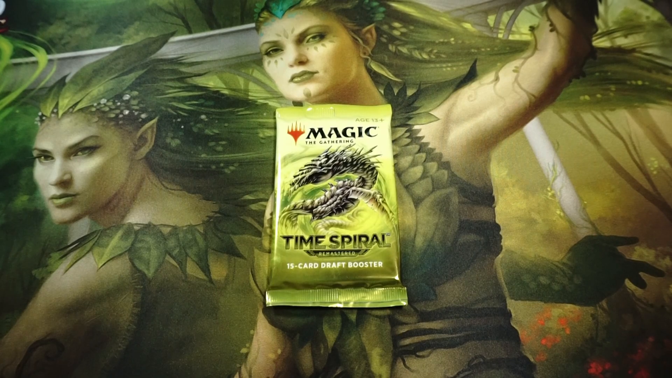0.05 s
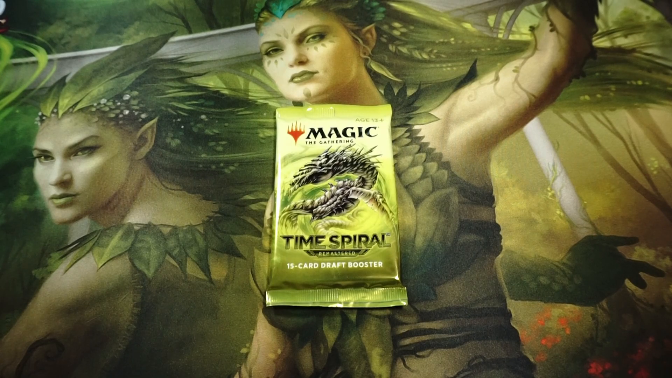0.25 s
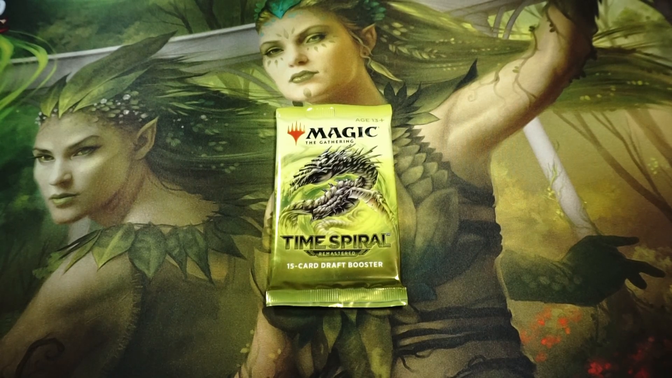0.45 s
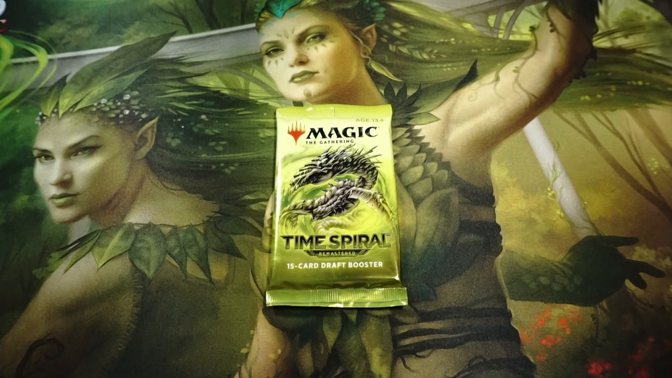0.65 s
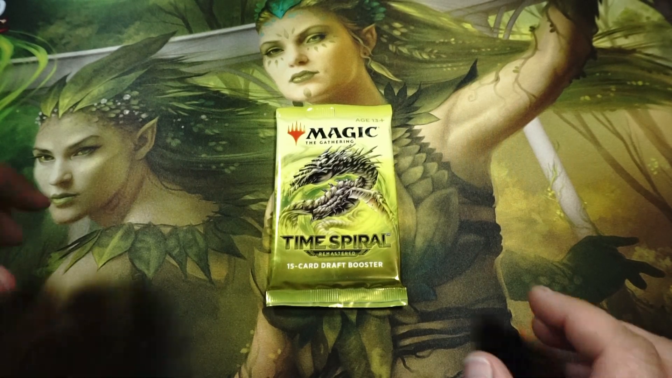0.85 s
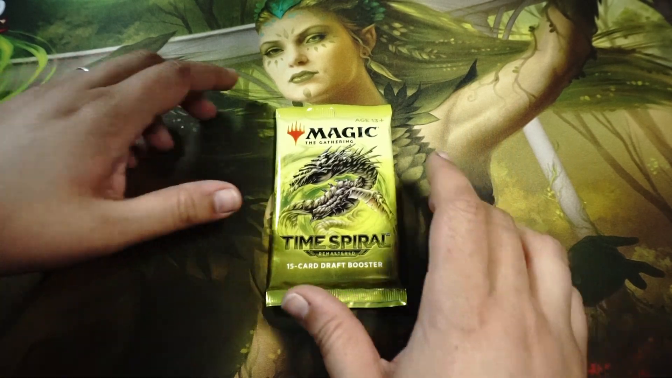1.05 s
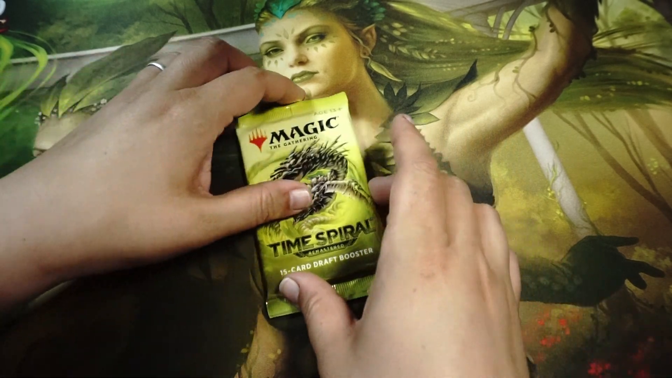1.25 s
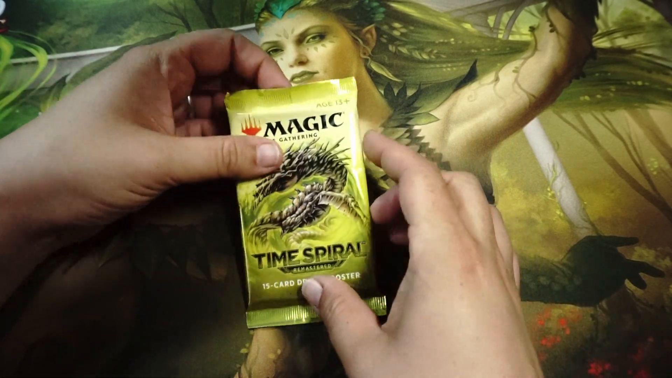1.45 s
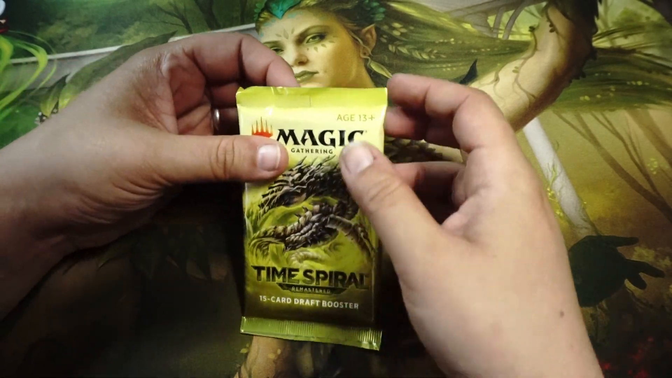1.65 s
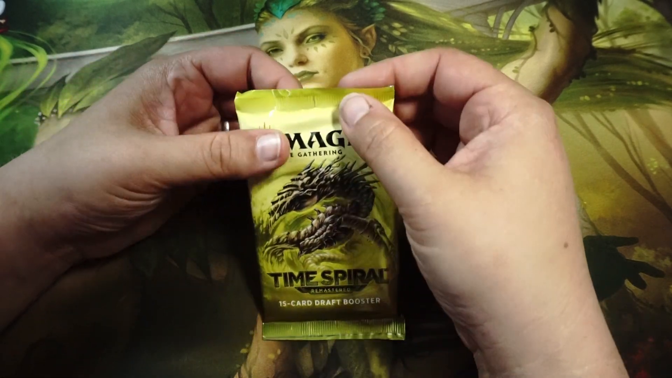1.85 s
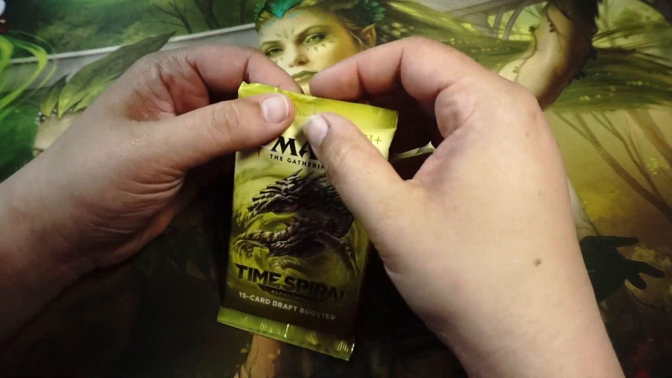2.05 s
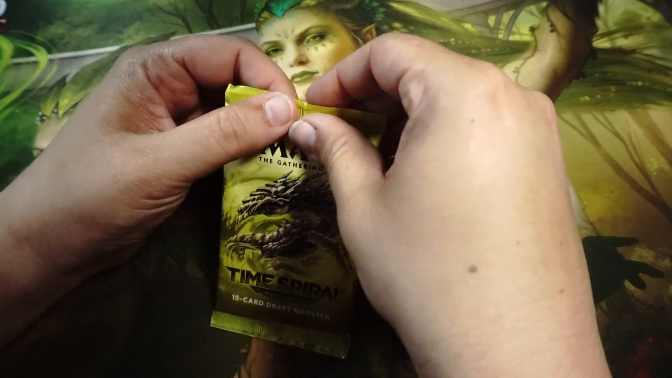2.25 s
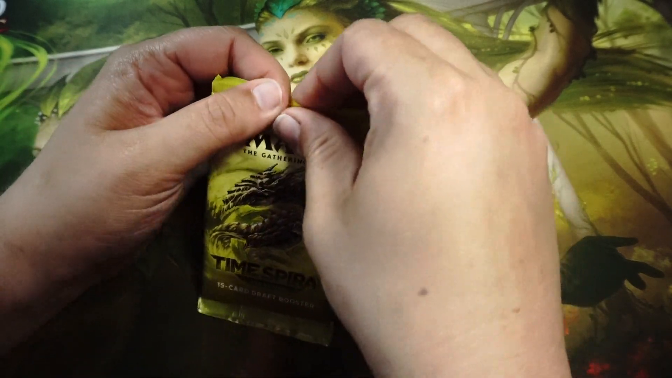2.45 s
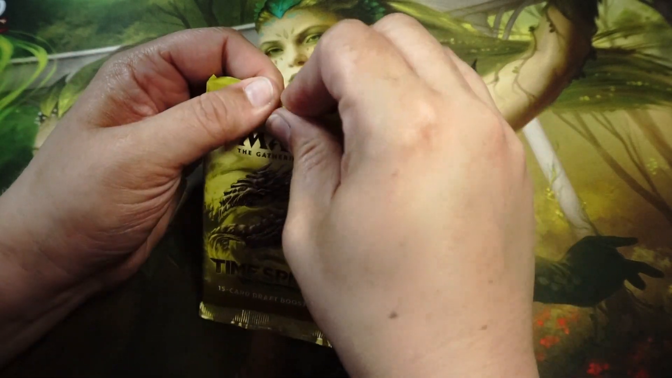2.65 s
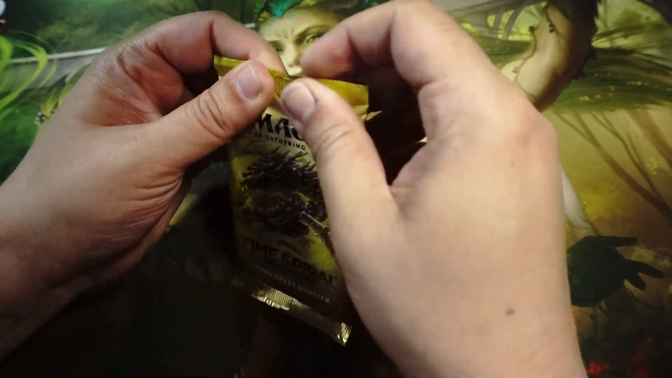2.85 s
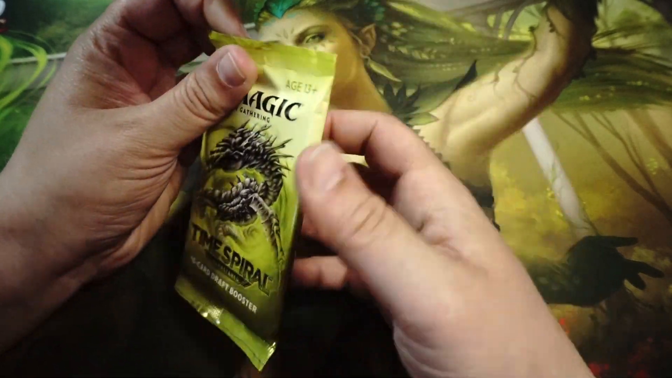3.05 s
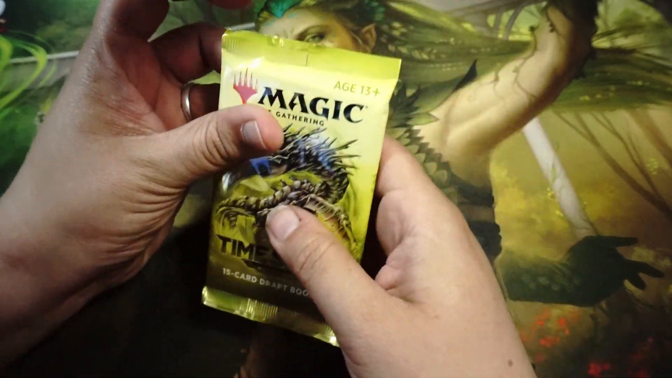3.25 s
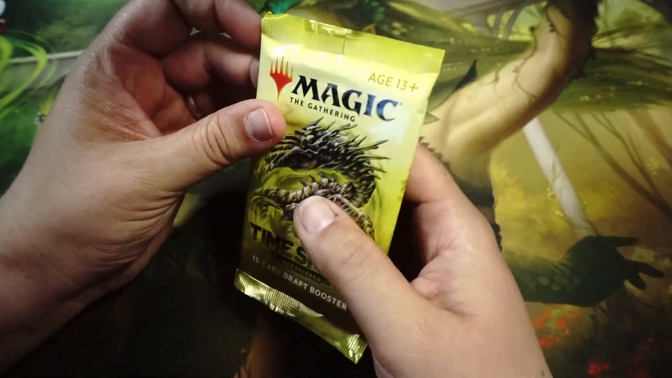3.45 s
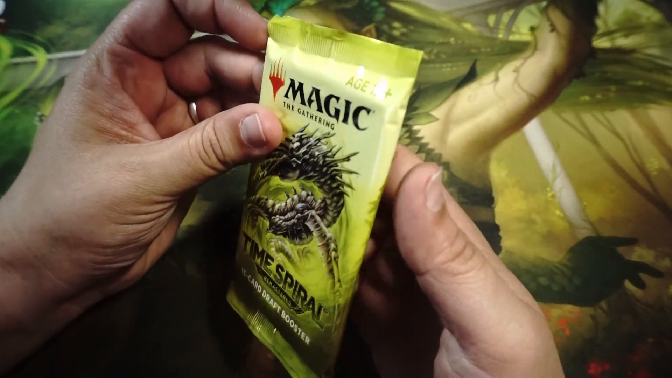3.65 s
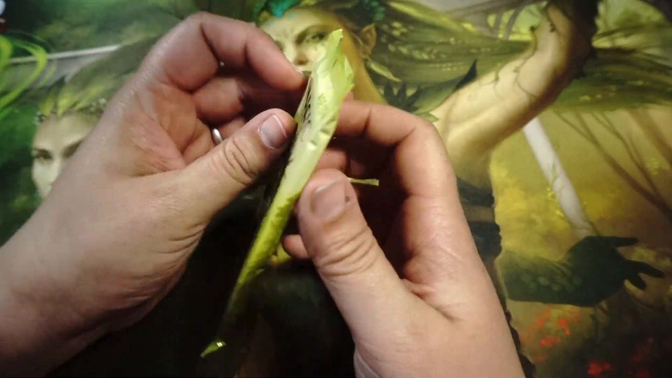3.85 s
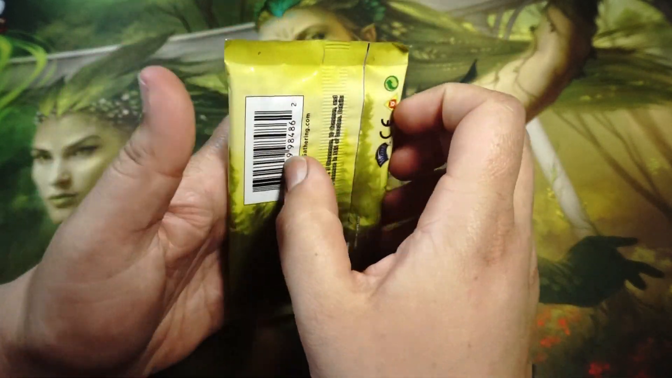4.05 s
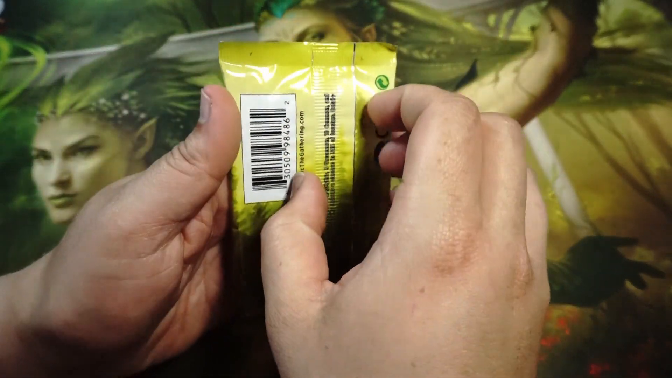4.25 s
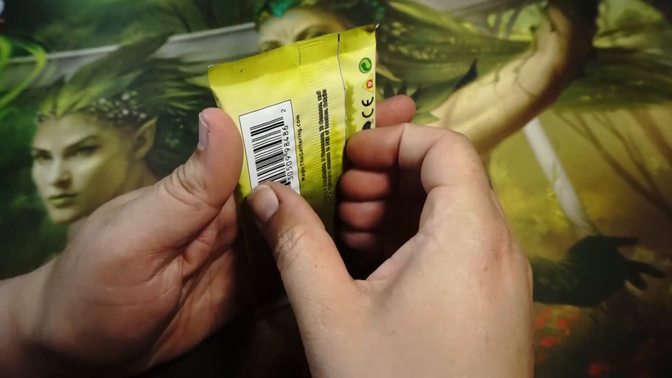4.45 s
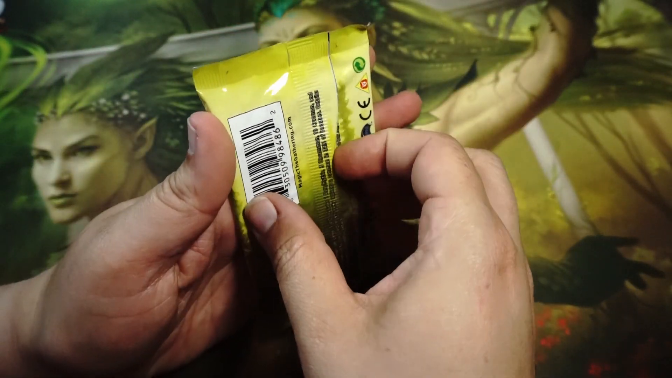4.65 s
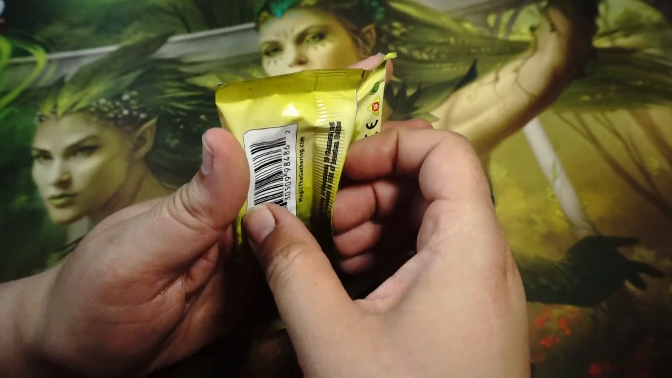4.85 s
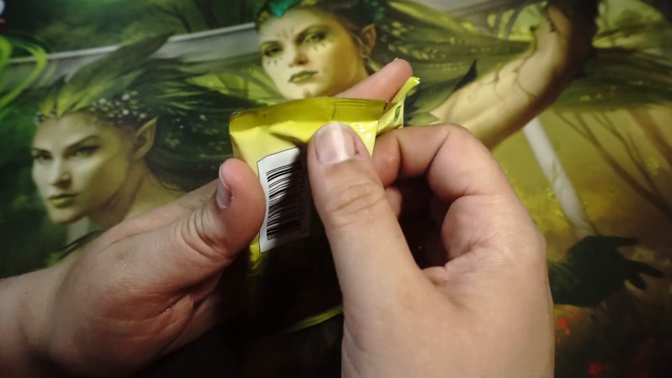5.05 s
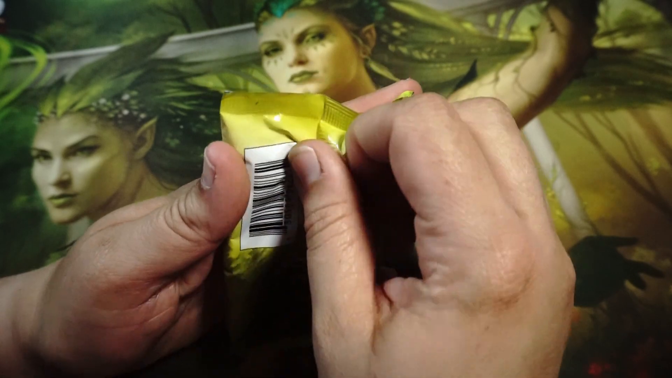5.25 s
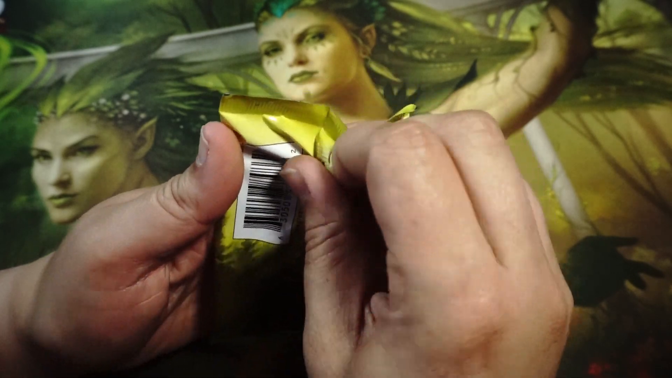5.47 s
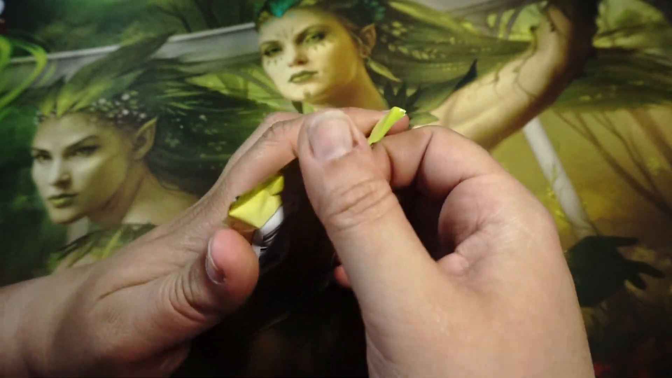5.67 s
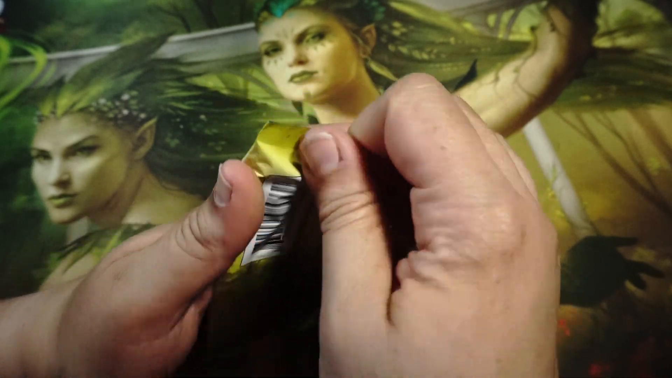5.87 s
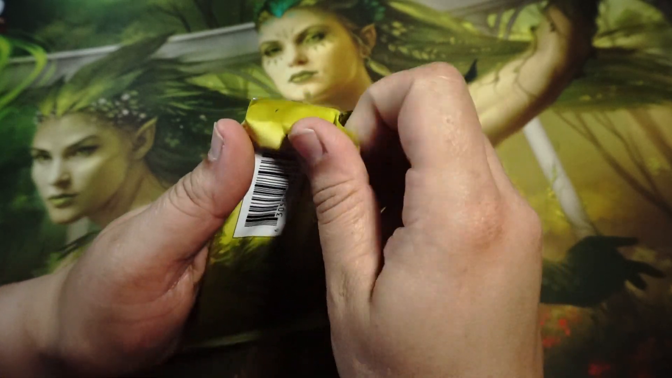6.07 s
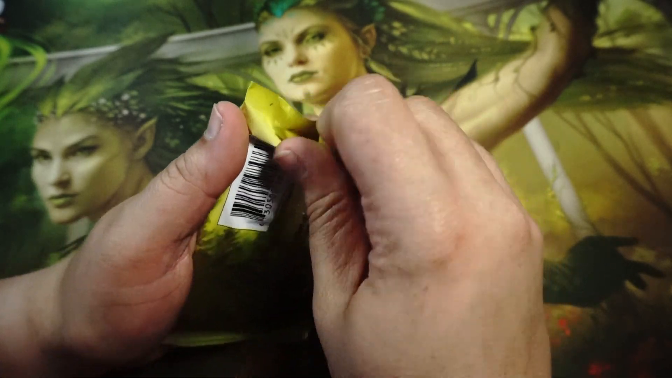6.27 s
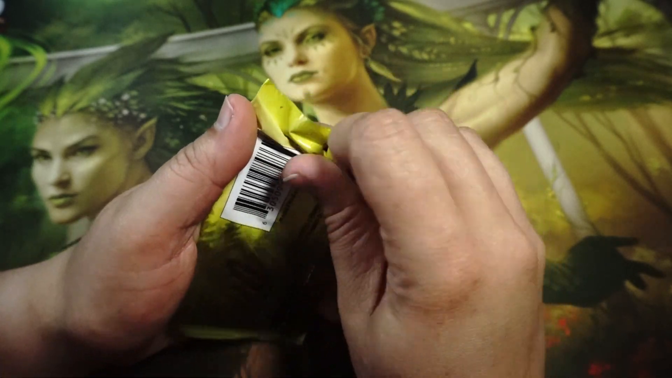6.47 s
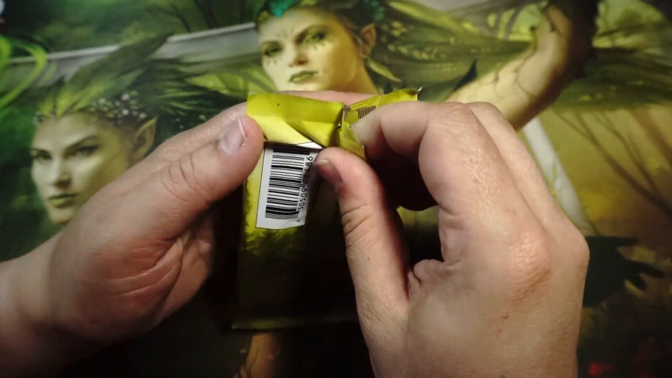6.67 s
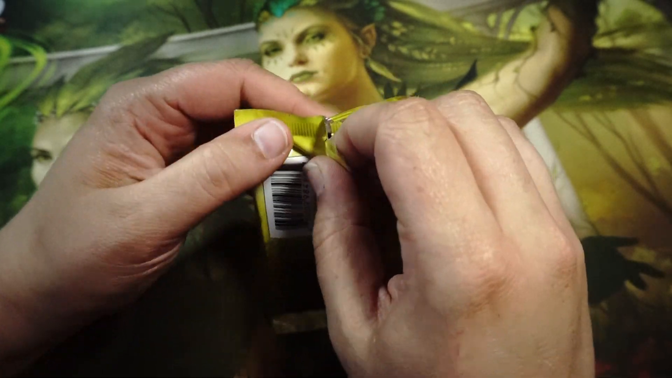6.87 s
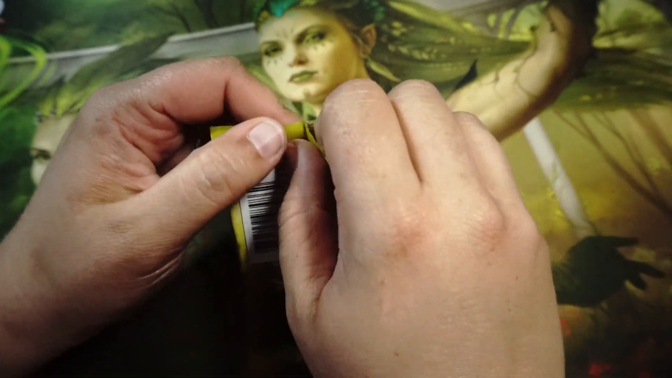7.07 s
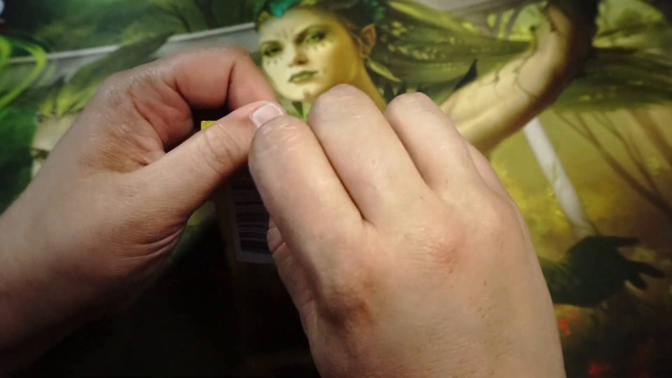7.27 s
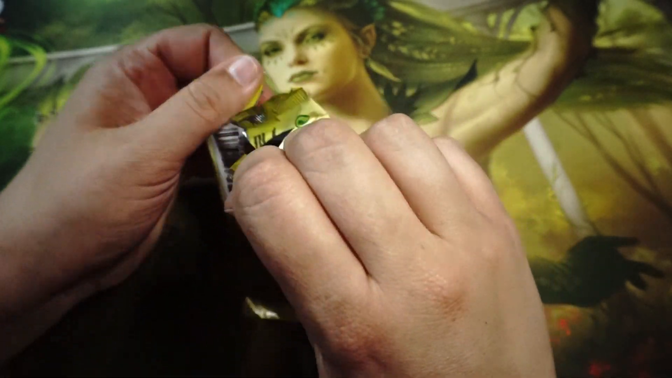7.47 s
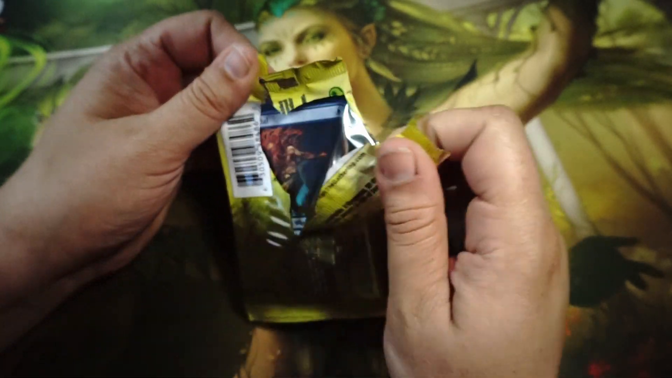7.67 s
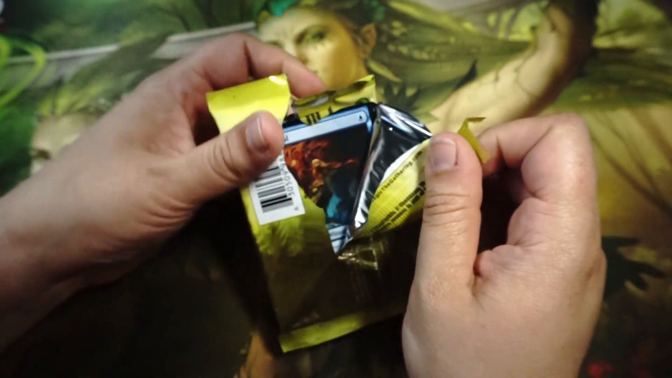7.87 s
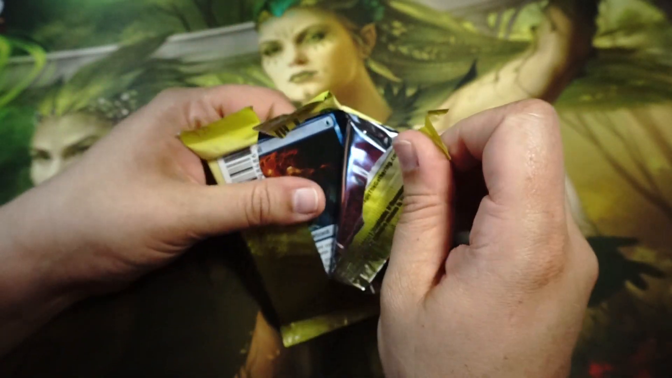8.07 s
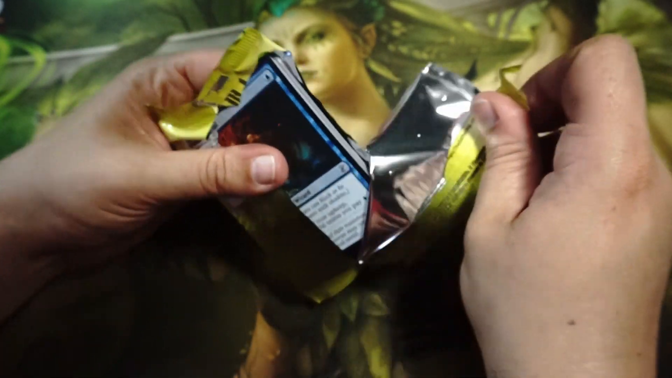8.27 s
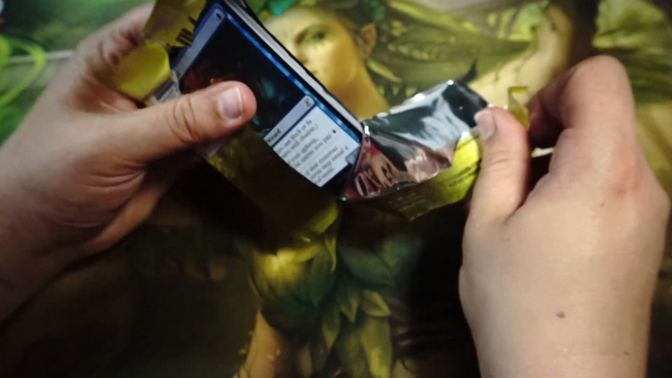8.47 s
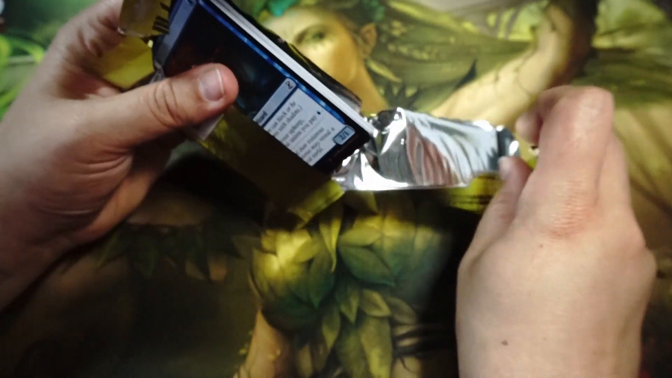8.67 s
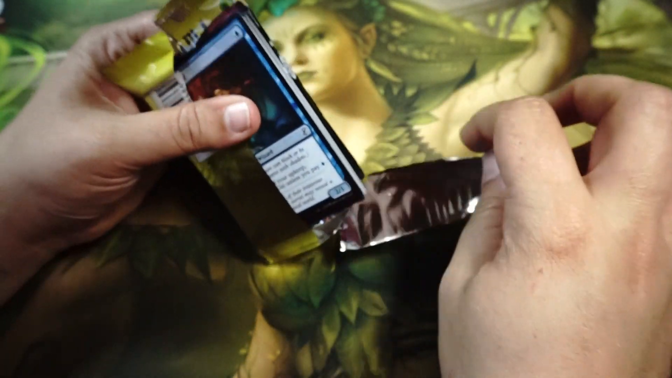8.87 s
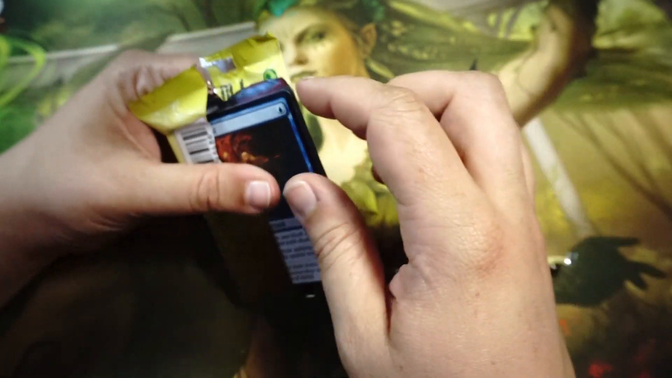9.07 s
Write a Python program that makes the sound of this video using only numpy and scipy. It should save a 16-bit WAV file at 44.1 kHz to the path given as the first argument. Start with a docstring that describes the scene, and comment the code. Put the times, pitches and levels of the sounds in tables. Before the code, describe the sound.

In a small quiet room, close to the microphone, about a second of faint rumble and hiss passes with one soft table bump. Hands then pick up a foil packet: sharp single snaps and fine crackles, a brief lull, then denser crumpling with dull finger knocks. The seam peels with a very short buzzing zip, followed by the loudest burst of crackling.

```python
"""Foil creases buckle in single snaps and showers of tiny cracks, close to a microphone, as two hands pick a pack
of cards off a cloth mat, flex it and pinch its crimp. The seam peels open in a quick stick-slip run.
Fingers rub the wrapper and knock the cards inside; the table booms softly.
Snaps and cracks are impulses ringing foil patches; rubs are filtered impulses; knocks are damped swings.
A small quiet room answers faintly, over low rumble, hiss and a thin hum."""
import sys
import numpy as np
from scipy import signal
from scipy.fft import rfft, irfft
from scipy.io import wavfile
from scipy.ndimage import uniform_filter1d, map_coordinates

SR = 44100
rng = np.random.default_rng(int(sys.argv[2]) if len(sys.argv) > 2 else 0)


def put_to_file(sound):
    """Save the sound as 16-bit audio at rate SR, in the file named by the first command-line argument."""
    columns = np.atleast_2d(sound).T  # one column per channel
    safe = np.clip(columns, -1, 1)
    whole_steps = np.round(safe * 32767)
    wavfile.write(sys.argv[1], SR, whole_steps.astype(np.int16))


N = 402191

# Creases that snap through. Each row: time in seconds, rms level in dB over 3 ms around the snap,
# centre of the ring in Hz.
CREASE_SNAPS = [(1.1852, -50.5, 5400), (1.23, -47.5, 5700), (1.262, -49.5, 6800), (1.3356, -35, 4800),
                (1.3788, -33, 6160), (1.431, -27.5, 5100), (1.4335, -38, 1730), (1.472, -28.5, 7550),
                (1.4894, -36, 4860), (1.5255, -42, 1900), (1.542, -43.5, 1400), (1.6081, -40, 5150),
                (1.6612, -41.5, 5600), (1.7615, -34.5, 3500), (1.8361, -40, 5330), (1.926, -30.5, 5650),
                (1.936, -36.5, 7000), (1.981, -28.5, 6070), (1.987, -32, 7580), (2.0846, -46, 5200),
                (2.158, -35.5, 5100), (2.3037, -38, 6200), (2.3554, -50, 2900), (2.412, -35, 5650),
                (2.4173, -33, 5870), (2.572, -27, 5530), (2.614, -35.5, 5600), (2.636, -45, 6990),
                (2.684, -46, 5000), (2.7098, -38, 5770), (2.7573, -38, 10800), (2.803, -49, 5900),
                (2.825, -37, 6040), (2.894, -43, 6517), (2.9157, -40, 4500), (3.068, -41, 6240),
                (3.1219, -38, 5100), (3.1303, -35, 5780), (3.1686, -31.5, 7670), (3.2662, -29, 6600),
                (3.345, -41, 6600), (4.156, -55.5, 5560), (4.299, -55.5, 2130), (4.586, -46.5, 4350),
                (4.6278, -48, 5750), (4.6995, -28, 6800), (4.7834, -25.5, 6330), (4.8569, -28, 5140),
                (4.867, -35.5, 6550), (5.0237, -40, 4300), (5.033, -37, 4060), (5.069, -33.5, 3184),
                (5.1086, -44, 6000), (5.165, -36, 5790), (5.1825, -26.5, 3150), (5.2632, -42, 5070),
                (5.306, -32.5, 4980), (5.315, -33.5, 3980), (5.401, -31.5, 5930), (5.403, -33, 5900),
                (5.515, -38, 5460), (5.521, -39.5, 4400), (5.557, -32.5, 6090), (5.734, -40.5, 5280),
                (5.7758, -30.5, 6300), (5.816, -30.5, 5500), (5.824, -35.5, 3346), (5.9177, -24.5, 4660),
                (5.929, -35.5, 7100), (5.99, -35.5, 5900), (6.027, -37, 6700), (6.0858, -32, 4930),
                (6.2243, -28.5, 7450), (6.3077, -25.5, 5600), (6.409, -31.5, 6540), (6.4566, -24.5, 7460),
                (6.473, -27, 9600), (6.7065, -42, 3600), (6.718, -37, 5100), (6.7605, -34.5, 5230),
                (6.9304, -31.5, 6350), (6.989, -34, 7447), (7.004, -36, 4940), (7.076, -42, 4500),
                (7.1211, -34, 7150), (7.1387, -29.5, 4240), (7.152, -34.5, 7700), (7.2393, -31.5, 6660),
                (7.3875, -29, 6270), (7.3972, -28, 7150), (7.444, -28.5, 6940), (7.4834, -27, 6200),
                (7.488, -24, 5800), (7.5216, -35, 7350), (7.6719, -34.5, 4200), (7.759, -37.5, 8600),
                (7.779, -34, 5930), (7.8217, -27, 5000), (7.835, -34, 5900), (7.9042, -39.5, 7500),
                (7.955, -34, 2850), (8.045, -30, 9700), (8.1158, -28.5, 6760), (8.162, -32, 4530),
                (8.197, -30, 6000), (8.231, -35, 1720), (8.2969, -23.5, 4100), (8.517, -31, 5550),
                (8.549, -24, 7300), (8.573, -29, 7000), (8.5871, -23.5, 5070), (8.594, -22, 8700),
                (8.6418, -26, 4930), (8.666, -29, 4960), (8.68, -27, 8320), (8.7052, -26, 6600),
                (8.708, -26.5, 7000), (8.7146, -20.5, 6300), (8.803, -29.5, 4470), (8.823, -39, 6650),
                (8.839, -33.5, 5450), (8.936, -39, 2860), (8.9763, -43.5, 6900)]
# Colour of the foil. Each row: frequency in Hz, spectral level in dB.
FOIL_COLOUR = [(200, -2.5), (900, 3), (1550, -0.5), (2300, 0), (3500, -4.5), (6500, -0.5), (10500, -4.5),
               (13400, -5.5)]
# Hold on the pack: picked up, turned over, pulled open. Each row: time in seconds, resting crackle level in dB.
GRIP = [(1.0, -86), (1.35, -62), (1.7, -70), (2.1, -66), (2.9, -64), (3.05, -72), (3.3, -79), (3.55, -81.5),
        (4.05, -69.5), (4.35, -78), (4.6, -62), (5.4, -56), (6.6, -52), (7.05, -59), (7.95, -62),
        (8.4, -56), (9.1, -54)]
# Squeezes and pulls that crumple the foil. Each row: start in seconds, length in seconds, mid-move level in dB.
SQUEEZES = [(1.42, 0.066, -49), (1.975, .11, -52), (2.34, 0.16, -59), (2.83, .055, -45.5),
            (3.11, .025, -50), (4.05, 0.012, -59), (4.685, .02, -48), (4.78, .11, -46),
            (5.02, 0.084, -50.5), (5.29, 0.13, -46.5), (5.52, 0.06, -47), (5.63, 0.0219, -46.5),
            (5.74, .12, -42), (5.87, .06, -40), (5.97, 0.0404, -44), (6.28, .1, -43), (6.92, .09, -48),
            (7.23, .09, -46.5), (7.37, .19, -45), (7.435, 0.046, -38.5), (7.67, .03, -46),
            (7.78, .06, -45.5), (8.05, 0.032, -42), (8.155, .23, -42.5), (8.688, 0.026, -31.5),
            (8.785, 0.066, -46.5), (9.07, 0.042, -46)]
# Foil brushing past a fingertip or over itself. Each row: start in seconds, length in seconds,
# mid-move level in dB.
BRUSHES = [(1.04, 0.24, -66.5), (3.655, 0.025, -64), (3.945, 0.033, -53.5), (4.435, 0.011, -51),
           (5.35, 0.13, -56.5), (8.549, 0.015, -33.5)]
# The seam peeling open. Each row: time in seconds, slips per second, mean level in dB, unevenness from 0 to 1.
SEAM_PEEL = [(8.316, 398, -41, .005), (8.323, 398, -32.5, .005), (8.341, 392, -36, .01),
             (8.356, 400, -34, .2), (8.385, 230, -36, .2), (8.428, 150, -49, .4)]
# Resonances of the stretched wrapper, at mid-peel. Each row: frequency in Hz, width in Hz, strength in dB.
POUCH_MODES = [(387, 96, -8), (1300, 270, 4), (2270, 160, 6.5), (4500, 600, 1.5), (6800, 3000, 2.5)]
# Colour of skin on the wrapper. Each row: frequency in Hz, spectral level in dB.
SKIN_COLOUR = [(40, -4.5), (120, 5), (400, -1), (1100, -6.5), (4000, -31)]
# Fingers and cards sliding along the wrapper. Each row: start in seconds, length in seconds,
# mid-move level in dB before RUB_GAIN_DB.
SLIDES = [(3.06, 0.14, -59), (4.55, 0.445, -62.5), (7.43, 0.025, -44), (7.7, 0.16, -55.5),
          (8.16, 0.15, -41), (8.432, 0.062, -48.5), (8.52, 0.18, -47), (8.8, 0.23, -57)]
# The flap and fingertips dragging. Each row: start in seconds, length in seconds, start pitch in Hz,
# end pitch in Hz, rms level in dB.
DRAGS = [(4.777, 0.17, 4300, 4030, -50.5), (7.432, 0.077, 2030, 2390, -43), (7.69, 0.054, 823, 738, -58),
         (8.018, .15, 390, 189, -46)]
# Finger knocks and whole panels popping over. Each row: time of the peak in seconds, peak of the swing in dB,
# pitch in Hz.
THUMPS = [(1.765, -40.5, 85), (3.132, -31.5, 530), (3.173, -32.5, 218), (3.628, -41, 288),
          (3.773, -44, 330), (3.898, -44, 146), (4.061, -31, 94.6), (4.512, -41.5, 147), (4.655, -39, 317),
          (4.786, -34.5, 151), (5.073, -36.5, 330), (5.919, -36, 175), (6.121, -27.5, 310),
          (6.309, -32.5, 335.3), (6.357, -35, 660), (6.458, -34, 94), (7.166, -35, 434), (7.492, -23, 119),
          (7.729, -33.5, 453), (7.808, -33.5, 88), (8.197, -25.5, 177), (8.304, -22.5, 240),
          (8.521, -25.5, 346), (8.609, -30.5, 150), (8.725, -30.5, 184)]
# Arms bumping the table. Each row: start in seconds, peak level in dB.
TABLE_BUMPS = [(0.613, -46.5), (1.529, -46.5), (1.958, -49.5), (4.438, -48)]
# Modes of the table, scattered at each bump. Each row: mean frequency in Hz, relative level in dB, t60 in seconds.
TABLE_MODES = [(45.1, 3, 1), (88.5, 0, 0.81), (127, 2, 0.29)]
# Colour of the still room. Each row: frequency in Hz, spectral level in dB.
AIR_COLOUR = [(20, 0.5), (52, 5.5), (130, -9.5), (420, -11.5), (1000, -17.5), (3500, -31.5), (13400, -39)]

AIR_DB, TOP_HZ = -65.5, 13400
# Hand moves: time constants of build and decay, rise in level over the hold
ATTACK_S, SWELL_DB, RELEASE_S = .008, 3, .016
# Skin drag: level at median effort before the gain, dB per dB of effort, gain
SKIN_DB, SKIN_DB_PER_DB, RUB_GAIN_DB = -70, 0.66, -1
# Settling foil: scale against its snap before the attack, decay time constant
SETTLE_DB, SETTLE_S = -27, .06


def snaps():
    """A crease flips in one sample; effort adds splinters around it, a firmer grip broadens its ring."""
    ring_s, whine, focus_db, focus_db_per_grip_db = 0.00017, 0.78, 3.5, 0.12
    splinter_db, splinter_db_per_effort_db = -11.0, 0.24
    build_s, fade_s, low_share, size = .0022, .0035, 0.11, 1024
    out = np.zeros(N)
    effort_db = above_median(flex())
    firm_db = np.maximum(above_median(curve(GRIP)), 0)
    t = (np.arange(size) - size // 2) / SR
    for s, db, hz in CREASE_SNAPS:
        i = int(s * SR)
        sparse = rng.standard_normal(size) * (rng.random(size) < .05)
        splinters = sparse * np.exp(-np.maximum(t / fade_s, -t / build_s))
        push = splinters * undb(splinter_db + splinter_db_per_effort_db * effort_db[i]) + (t == 0)
        focus = max(focus_db - focus_db_per_grip_db * firm_db[i], 1)
        patch = facet(hz, ring_s * 2 ** (rng.random() - .5), focus, whine)
        snap = signal.fftconvolve(push, patch)
        # a small patch radiates little bass
        low_hz = min(low_share * hz * 2 ** rng.uniform(-1.9, 1), TOP_HZ)
        snap = signal.sosfilt(signal.butter(2, low_hz, "highpass", fs=SR, output="sos"), snap)
        snap /= np.sqrt(np.mean(snap[:size][np.abs(t - .001) < .0015] ** 2))
        add(out, s + t[0], snap * undb(db))
    return out


def facet(hz, ring_s, focus_db, whine, size=512):
    """Ring of one foil patch: a short rattle and four bending modes scattered about its pitch."""
    t = np.arange(size) / SR
    burst = rng.standard_normal(size) * np.exp(-t / ring_s)
    rattle = convolve(burst, response(FOIL_COLOUR, hz, focus_db))
    modes_hz = np.clip(hz * np.exp(0.43 * rng.standard_normal(size=(4, 1))), 1900, TOP_HZ)
    waves = np.sin(2 * np.pi * (modes_hz * t + rng.random(modes_hz.shape)))
    modes = np.sum(waves, axis=0) * np.exp(-t / (2 * ring_s))
    return unit(unit(rattle) + whine * unit(modes))


def crackle():
    """Foil cracks more often as it is worked harder; a light touch or a brushing finger only rustles."""
    rate_per_s, spread_db, window_s = 320, 8, .09  # rate at median effort
    rustle_db, tick_hz = -3, 5200
    flex_db = flex()
    effort_db = above_median(flex_db)
    rate = rate_per_s * undb(0.8 * effort_db)
    cracks = ticks(rate, spread_db, undb(rustle_db - 0.076 * effort_db), tick_hz)
    brush = unit(convolve(rng.standard_normal(N), response(FOIL_COLOUR, tick_hz, 1.0)))
    return steady(cracks, window_s) * undb(flex_db) + brush * np.sqrt(moves(BRUSHES))


def ticks(rate, spread_db, rustle, centre_hz):
    """Cracks trail splinters over a fine rustle; load varies on each of several differently coloured panels."""
    count, focus_db, ring_s, whine = 12, 2.15, .00024, .4
    panel_s, load_db, splinter_s = .035, 6.5, .0016
    out, hold = np.zeros(N), int(panel_s * SR)
    for _ in range(count):
        steps_db = load_db * np.minimum(rng.standard_normal(N // hold + 2), 1.5)
        load = np.repeat(undb(steps_db), hold)
        load = uniform_filter1d(load[rng.integers(hold):][:N], hold // 4)
        cracks = shower(rate / count, spread_db)
        cracks /= np.sqrt(np.mean(cracks ** 2) * rate / np.mean(rate))
        splinter_power = np.abs(uniform_filter1d(cracks ** 2, int(splinter_s * SR)))
        push = cracks + rng.standard_normal(N) * np.sqrt(splinter_power + rustle ** 2)
        panel_hz = centre_hz * 2 ** (rng.random() - .5)
        out += convolve(push * load, facet(panel_hz, ring_s, focus_db, whine))
    return out


def flex():
    """How hard the foil is worked, in dB: summed power of grip, squeezes and settling after each snap."""
    power = undb(curve(GRIP)) ** 2 + moves(SQUEEZES)
    t = np.arange(SR // 2) / SR
    settling = np.exp(-t / SETTLE_S) * (1 - np.exp(-t / ATTACK_S))
    for s, db, _ in CREASE_SNAPS:
        add(power, s, (undb(db + SETTLE_DB) * settling) ** 2)
    return 10 * np.log10(power)


def moves(rows):
    """Power of hand moves: exponential attack, swelling hold, exponential release."""
    power, t = np.zeros(N), np.arange(SR) / SR - .1
    for s, length_s, db in rows:
        edges = np.exp(np.minimum(t, 0) / ATTACK_S - np.maximum(t - length_s, 0) / RELEASE_S)
        swell_db = SWELL_DB * (np.clip(t / length_s, 0, 1) - .5)
        add(power, s + t[0], (edges * undb(db + swell_db)) ** 2)
    return power


def hands(x):
    """Cupped hands mirror the foil from a few centimetres away; the echo's lag shifts as they move."""
    near_s, far_s, move_s, echo_db = .00015, .0007, .15, -8
    lags_s = rng.uniform(near_s, far_s, int(N / SR / move_s) + 2)
    lag_s = np.interp(np.arange(N) / SR, np.arange(len(lags_s)) * move_s, lags_s)
    echo = map_coordinates(x, [np.arange(N) - lag_s * SR], order=3)
    return (x + undb(echo_db) * echo) / np.hypot(1, undb(echo_db))


def peel():
    """Glue sticks and slips, ringing the tightening pouch higher: an even squeak, then a slower, ragged stutter."""
    scatter_db, rasp_db, rasp_s, rise_octaves, size = 2.5, -12, .0007, 0.19, 256
    times, rates, levels, uneven = np.transpose(SEAM_PEEL)
    out, s, t = np.zeros(N), times[0], np.arange(size) / SR
    while s < times[-1]:
        rate, ragged = np.interp(s, times, rates), np.interp(s, times, uneven)
        progress = (s - times[0]) / (times[-1] - times[0])
        taut = 2 ** (rise_octaves * (progress - .5))
        slip = np.zeros(size)
        for k, (hz, width_hz, db) in enumerate(POUCH_MODES):
            mode_hz = hz * taut * (1 + ragged / 2 * rng.standard_normal())
            decay = np.sqrt(width_hz) * np.exp(-np.pi * width_hz * t)
            slip += (-1) ** k * undb(db) * decay * np.sin(2 * np.pi * mode_hz * t)
        rasp = rng.standard_normal(size) * np.exp(-t / rasp_s)
        db = np.interp(s, times, levels) + scatter_db * rng.standard_normal()
        # the square root makes the level that of the whole train of slips
        sound = unit(unit(slip) + undb(rasp_db) * unit(rasp))
        add(out, s, sound * undb(db) * np.sqrt(SR / rate / size))
        s += np.exp(ragged * rng.standard_normal()) / rate
    return out


def rub():
    """Skin catches and lets go on the wrapper, harder with each squeeze and slide; the cards dull it."""
    rate_per_s, spread_db, window_s = 700, 11.0, 0.058
    effort_db = above_median(flex())
    power = undb(SKIN_DB + SKIN_DB_PER_DB * effort_db) ** 2 + moves(SLIDES)
    catches = convolve(shower(rate_per_s, spread_db), response(SKIN_COLOUR))
    return steady(catches, window_s) * np.sqrt(power) * undb(RUB_GAIN_DB)


def drags():
    """Uneven little catches ring one broad resonance that glides as the grip shifts."""
    half_width, rate_per_s, spread_db, window_s = .22, 1500, 5, 0.046  # half width as a share of start pitch
    out = np.zeros(N)
    for s, length_s, start_hz, end_hz, db in DRAGS:
        hz = np.geomspace(start_hz, end_hz, num=int(length_s * SR))
        catches = shower(rate_per_s, spread_db)[:len(hz)]
        # shift the gliding pitch to zero, low-pass, shift back
        turn = np.exp(2j * np.pi * np.cumsum(hz) / SR)
        lowpass = signal.butter(2, half_width * start_hz, fs=SR, output="sos")
        sound = np.real(turn * signal.sosfilt(lowpass, catches / turn))
        add(out, s, undb(db) * unit(steady(sound, window_s) * signal.windows.tukey(len(hz), .5)))
    return out


def thumps():
    """A damped swing of the pack lasts about a cycle; higher-pitched knocks scuff the wrapper more."""
    rise_cycles, scuff_db, scuff_s, size = 0.509, -15, 0.011, 4096
    out, t = np.zeros(N), np.arange(size) / SR
    for s, db, hz in THUMPS:
        age = t * hz / rise_cycles  # 1 at the peak
        swing = (age * np.exp(1 - age)) ** 3 * np.cos(2 * np.pi * rise_cycles * (age - 1))
        noise = unit(convolve(rng.standard_normal(size), response(SKIN_COLOUR)))
        scuff = noise * np.exp(-t / scuff_s) * hz / 250  # scuff_db holds at 250 Hz
        add(out, s - rise_cycles / hz, undb(db) * (swing + undb(scuff_db) * scuff))
    return out


def table():
    """The table top booms softly under the mat: a few decaying modes per bump."""
    out, t = np.zeros(N), np.arange(SR // 2) / SR
    for s, peak_db in TABLE_BUMPS:
        boom = np.zeros(len(t))
        for hz, db, t60_s in TABLE_MODES:
            mode_hz = hz * (1 + 0.125 * rng.standard_normal())
            boom += undb(db - 60 * t / t60_s) * np.sin(2 * np.pi * mode_hz * t)
        add(out, s, undb(peak_db) * boom / np.abs(boom).max())
    return out


def room(x):
    """Table and walls return a faint, short, slightly dull tail of decaying noise."""
    t60_s, damp_hz, wet_db, gap_s = 0.49, 8000, -18, .004
    t = np.arange(SR // 2) / SR
    tail = rng.standard_normal(len(t)) * undb(-60 * t / t60_s) * (t > gap_s)
    tail = signal.sosfilt(signal.butter(1, damp_hz, fs=SR, output="sos"), tail)
    return x + undb(wet_db) * convolve(x, tail / np.linalg.norm(tail))


def air():
    """Still room: coloured noise gives low rumble and faint hiss, a sine the thin hum."""
    hum_hz, hum_db = 411, -85
    noise = unit(convolve(rng.standard_normal(N), response(AIR_COLOUR, size=8192)))
    hum = np.sin(2 * np.pi * hum_hz * np.arange(N) / SR)
    return undb(AIR_DB) * noise + undb(hum_db) * hum


def shower(rate, spread_db):
    """Random impulses at a rate per second, many small and a few large."""
    out = np.zeros(N)
    hits = np.flatnonzero(rng.random(N) < rate / SR)
    draws = rng.standard_normal((N // 20, 2))[:len(hits)]
    out[hits[:len(draws)]] = undb(spread_db * np.minimum(draws[:, 0], 2)) * np.sign(draws[:, 1])
    return out


def response(points, centre_hz=1000, focus_db=0, size=1024):
    """Minimum-phase impulse response of a colour, cut by focus_db per squared octave from a centre."""
    hz, db = np.transpose(points)
    octave = np.log2(np.maximum(np.fft.rfftfreq(size, 1 / SR), 1))
    distance = np.minimum((octave - np.log2(centre_hz)) ** 2, 2 * 2)  # no further cut past two octaves
    db = np.interp(octave, np.log2(hz), db) - focus_db * distance
    # folding the cepstrum makes it causal
    cepstrum = irfft(np.log(undb(db)))
    cepstrum[1:size // 2] *= 2
    cepstrum[size // 2 + 1:] = 0
    return irfft(np.exp(rfft(cepstrum)))


def convolve(x, impulse):
    """Pass a sound through an impulse response, keeping its length."""
    return signal.oaconvolve(x, impulse)[:len(x)]


def steady(x, window_s):
    """Even out the slow level to about rms 1 and keep the fine grain."""
    power = uniform_filter1d(x ** 2, max(int(window_s * SR), 1))
    return x / np.sqrt(np.abs(power) + np.mean(x ** 2) / 1000)


def curve(rows, axis=1):
    """One column of a table, joined by straight lines in time."""
    rows = np.array(rows, float)
    return np.interp(np.arange(N) / SR, rows[:, 0], rows[:, axis])


def above_median(db):
    """Level relative to its median over time."""
    return db - np.median(db)


def undb(db):
    """Decibels to gain."""
    return 10 ** (np.asarray(db) / 20)


def unit(x):
    """Scale to rms 1."""
    return x / np.sqrt(np.mean(x ** 2))


def add(out, s, sound):
    """Mix a sound in at time s."""
    i = max(int(s * SR), 0)
    out[i:i + len(sound)] += sound[:max(N - i, 0)]


def scene():
    """Foil and fingers with the room's tail, plus knocks, table and air."""
    foil = hands(snaps() + crackle())
    wrapper = room(foil + peel() + rub() + drags())
    return (wrapper + thumps() + table() + air())[None]


def record(dry):
    """Cut the treble steeply above TOP_HZ with an elliptic low-pass."""
    return signal.sosfilt(signal.ellip(10, .2, 70, TOP_HZ, fs=SR, output="sos"), dry)


dry = scene()
out = record(dry)
put_to_file(out)
```